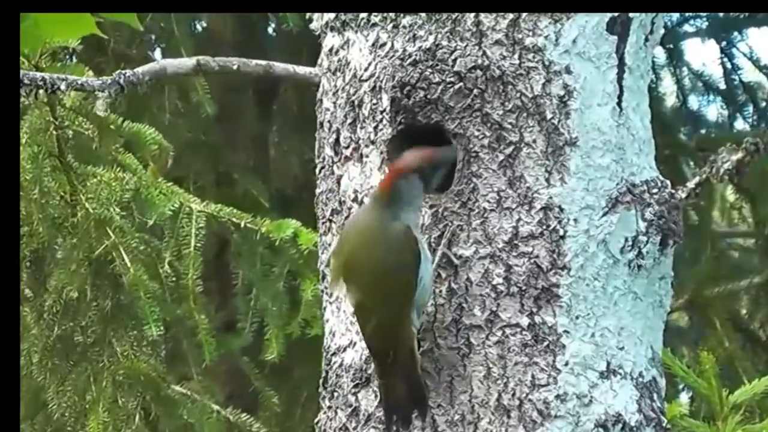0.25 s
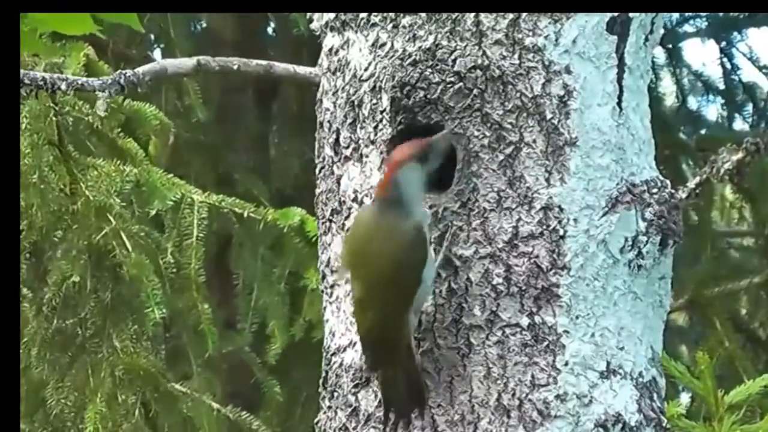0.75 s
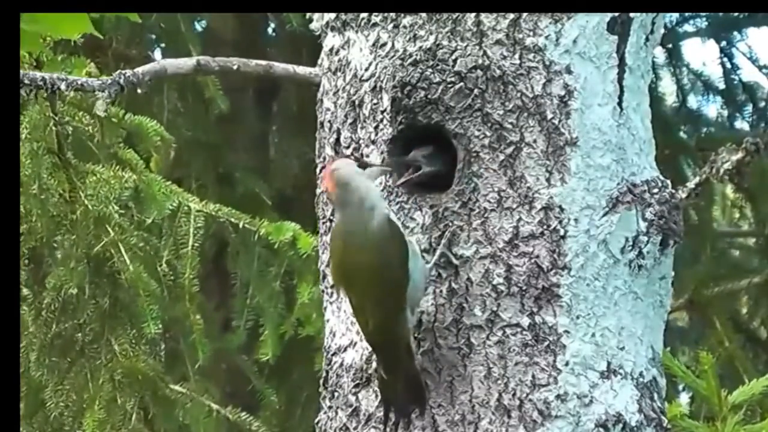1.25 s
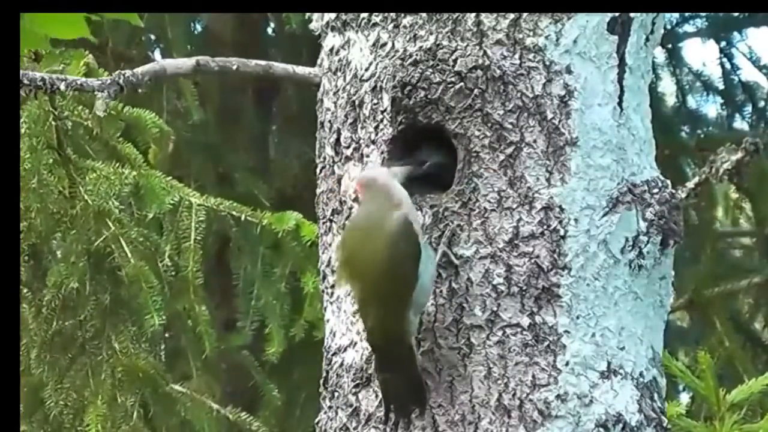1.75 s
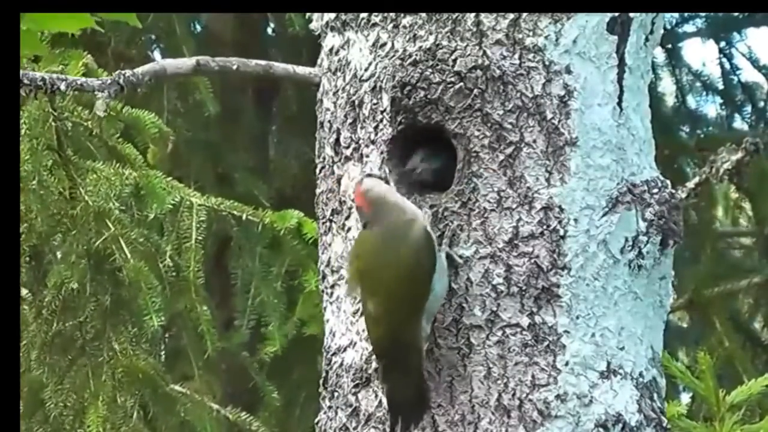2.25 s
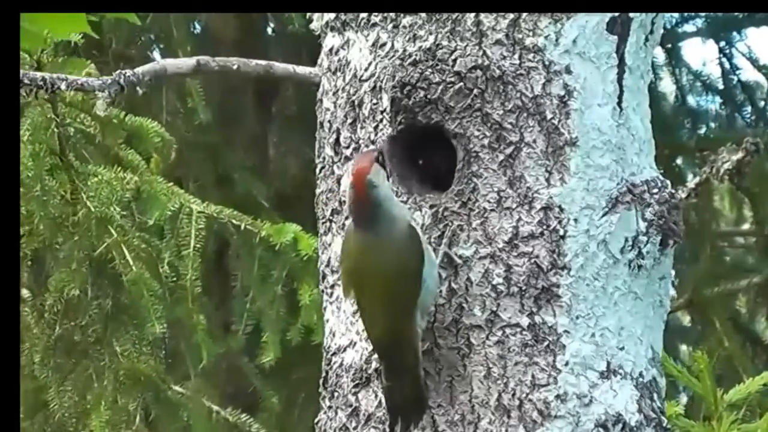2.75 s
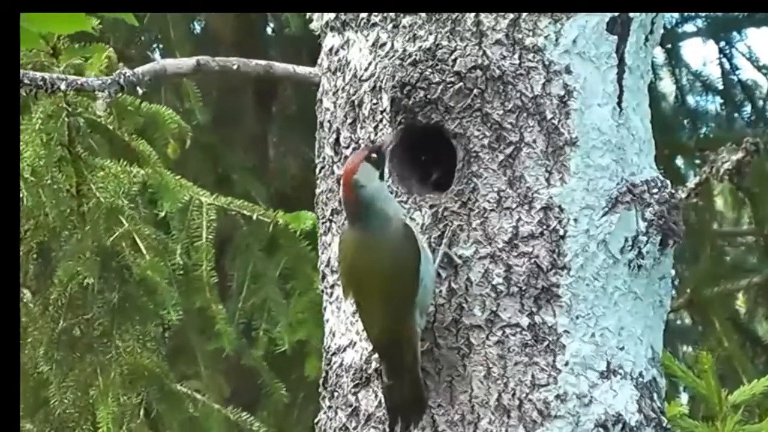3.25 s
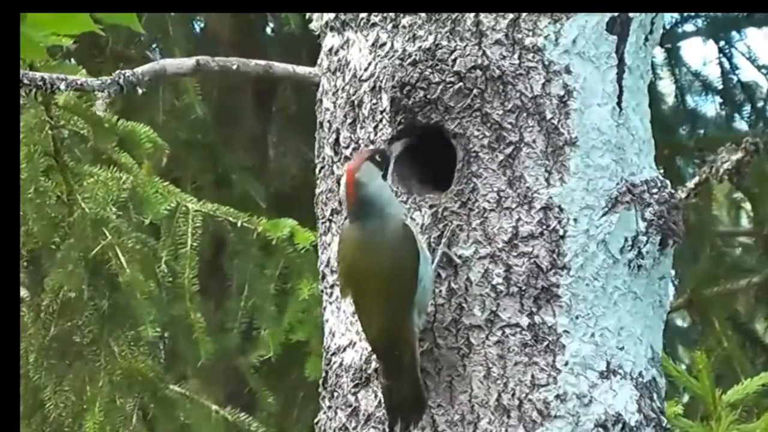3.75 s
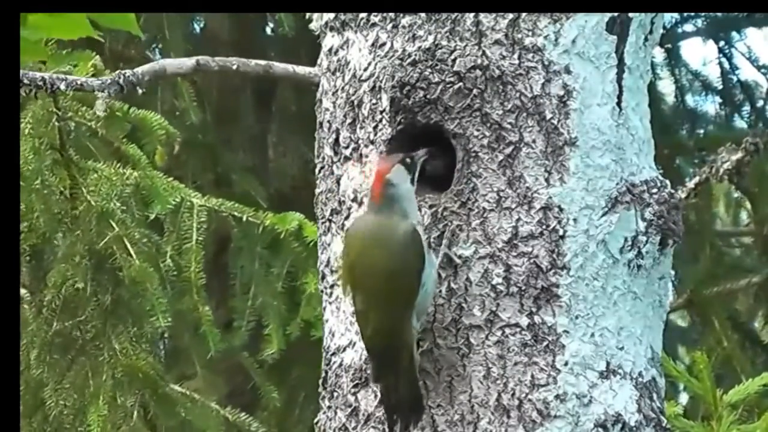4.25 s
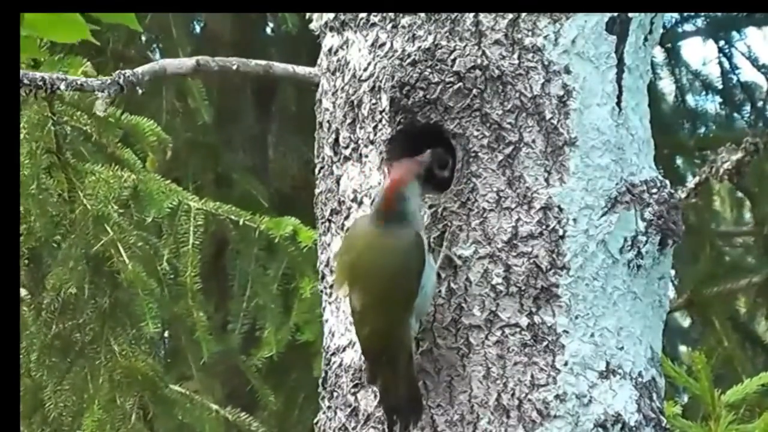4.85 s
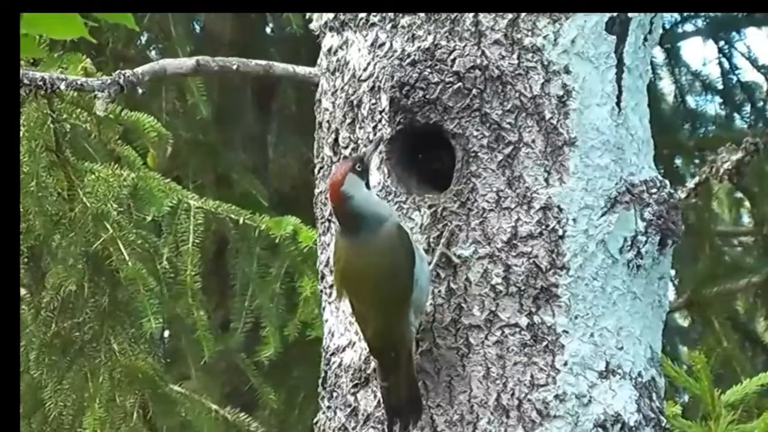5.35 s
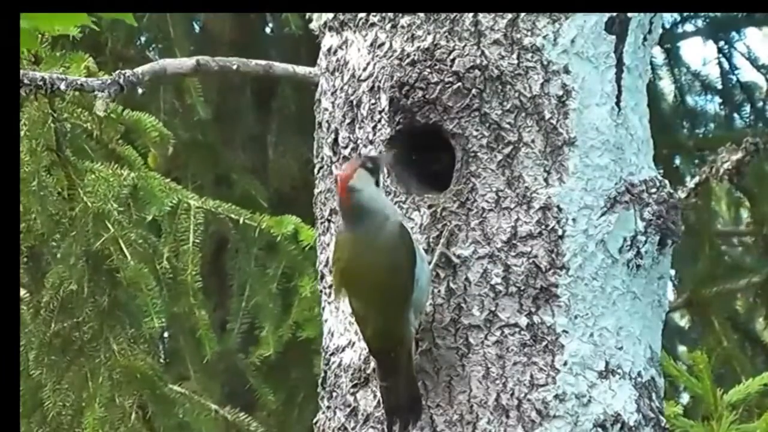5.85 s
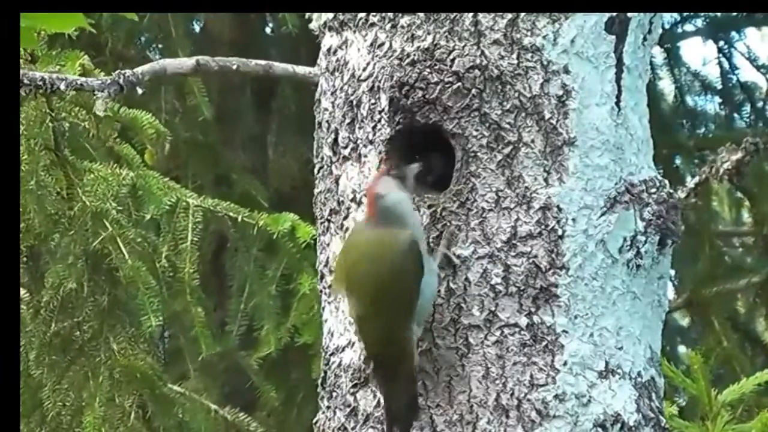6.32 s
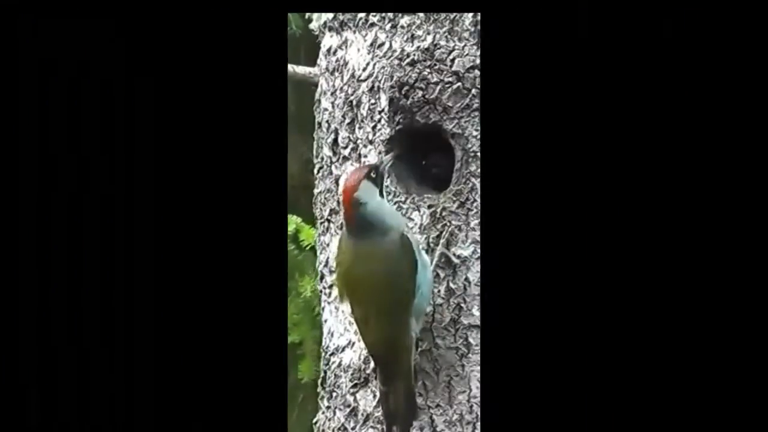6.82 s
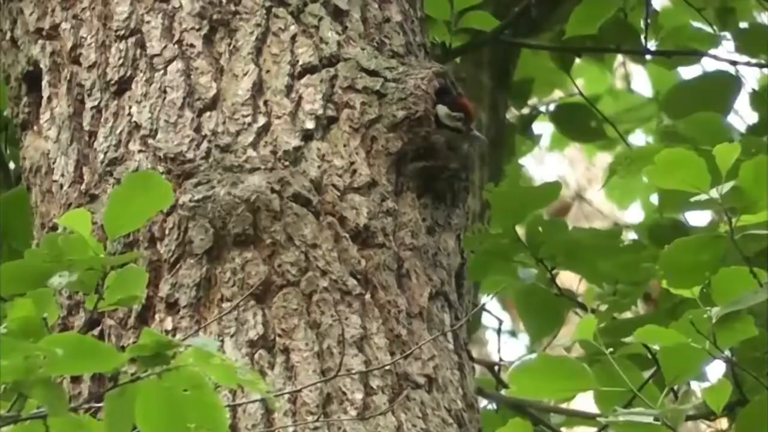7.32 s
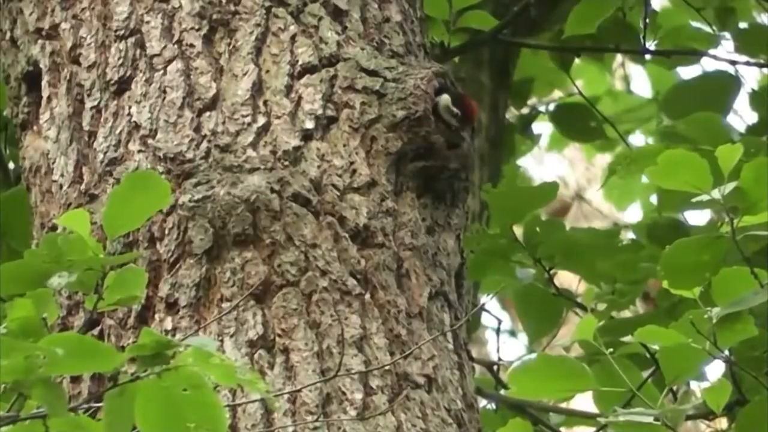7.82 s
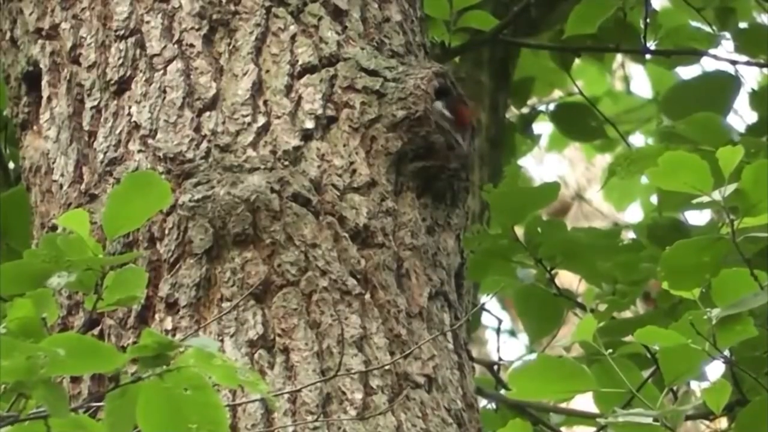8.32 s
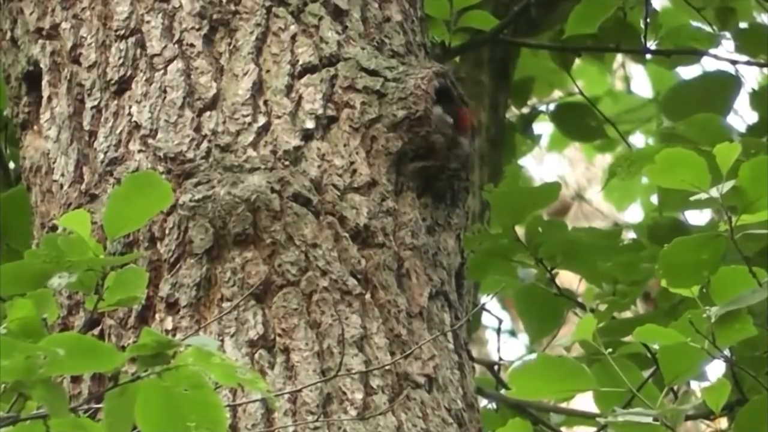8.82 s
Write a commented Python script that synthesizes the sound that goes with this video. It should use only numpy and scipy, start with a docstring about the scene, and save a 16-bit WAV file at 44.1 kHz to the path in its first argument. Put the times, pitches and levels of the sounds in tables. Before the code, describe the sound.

In quiet forest air with faint low gusts, a woodpecker nestling begs about four times a second, each call a creaky rasp ending in a short nasal honk. The calls weaken for a moment while a distant songbird lisps thinly, then return strongly. After a tiny silent gap, another place: an older chick gives sharp, high, arched cries about five a second, echoing among trunks over a faint low drone. Close stereo microphone at first, more reverberant afterwards.

```python
"""A forest with two woodpecker holes, heard through two microphone ports, a short silent cut between them.
At the first hole, in forest air and gusty low wind, a chick rasps with creaky pulses and breath, each rasp
ending on a honk of stacked partials; far off a small songbird lisps in thin arching whistles.
At the second, over a far drone, an older chick cries high arched notes, stacks of partials that sweep
up and fall; their echoes ring on among the trunks."""
import sys
import numpy as np
from scipy import signal
from scipy.fft import rfft, irfft
from scipy.io import wavfile
from scipy.ndimage import uniform_filter1d

SR = 44100
rng = np.random.default_rng(int(sys.argv[2]) if len(sys.argv) > 2 else 0)


def put_to_file(sound):
    """Save the sound as 16-bit audio at rate SR, in the file named by the first command-line argument."""
    columns = np.atleast_2d(sound).T  # one column per channel
    safe = np.clip(columns, -1, 1)
    whole_steps = np.round(safe * 32767)
    wavfile.write(sys.argv[1], SR, whole_steps.astype(np.int16))


N = 400428


def gain_of(db):
    """Decibels to gain."""
    return 10 ** (np.asarray(db) / 20)


def evened(x):
    """Scales to rms 1."""
    return x / np.sqrt(np.mean(x ** 2) + 1e-20)


def read(points, hz):
    """Reads a spectrum on a log-frequency axis."""
    f, value = np.transpose(points)
    return np.interp(np.log(hz + 1), np.log(f + 1), value)


def add(mix, s, sound):
    """Mixes a sound in at s seconds."""
    part = mix[max(round(s * SR), 0):][:len(sound)]
    part += sound[:len(part)]


def ring(x, modes, stretch):
    """Passes x through steep resonances whose centre frequencies are stretched by a factor."""
    hz = np.fft.rfftfreq(len(x), 1 / SR)
    response = 0
    for k, (f, width, db) in enumerate(modes):
        response = response + (-1) ** k * gain_of(db) / (1 + 1j * (hz - f * stretch) / width) ** 2
    return irfft(rfft(x) * response, len(x))


def waver(count, per_s):
    """Slow random wander of rms 1: noise averaged twice over 1 / per_s seconds."""
    size = max(int(SR / per_s), 2)
    return evened(uniform_filter1d(uniform_filter1d(rng.standard_normal(count), size), size))


# forest air at each hole, relative spectrum: f/Hz, level/dB per Hz
AIR_COLOUR_1 = [(18, -37), (30, -20), (66, 1), (276, -1.5), (369, 1.5), (672, -3), (896, -0.5), (1290, -9),
                (1680, -11), (2180, -15), (2680, -16.5), (4530, -8), (9410, -17), (13900, -34),
                (15500, -32)]
AIR_COLOUR_2 = [(25, -50), (60, -5), (110, -3), (220, -5), (350, -5.5), (600, -11), (1500, -13),
                (4000, -2.5), (9000, -23), (15500, -32)]
# left-right likeness of the air: f/Hz, likeness [-1 to 1]
AIR_LIKENESS_1 = [(60, -0.48), (130, -0.51), (290, -0.031), (640, 0.41), (1410, 0.35), (3100, 0.84),
                  (6820, 1), (15000, -0.064)]
AIR_LIKENESS_2 = [(60, 0.9), (130, 0.96), (290, 0.64), (640, 0.049), (1410, 0.79), (3100, 1.0), (6820, 1),
                  (15000, 0.94)]
# left-right lean of the air: f/Hz, left minus right level/dB
AIR_LEAN_1 = [(60, -6), (240, -3.5), (950, 1.5), (3770, -1), (15000, 0.5)]
AIR_LEAN_2 = [(60, -0.5), (240, 0.0), (950, 0.0), (3770, 0.0), (15000, 0.0)]
AIR_1_DB, AIR_2_DB = -51.5, -53.5


def air(colour, level_db, likeness, lean, patchy_db):
    """Forest air: random short-time spectra with drifting patches, partly alike at the two ports."""
    frames, hz = N // 256 + 5, np.fft.rfftfreq(1024, 1 / SR)
    a, b, c, d, patches = rng.standard_normal((frames, 513, 5)).T
    patches = uniform_filter1d(patches, size=12, axis=0)
    patches = evened(uniform_filter1d(patches, size=20, axis=1))
    like = np.clip(read(likeness, hz), -1, 1)[:, None]
    left = a + 1j * b
    right = like * left + np.sqrt(1 - like ** 2) * (c + 1j * d)
    half_lean_db = read(lean, hz)[:, None] / 2
    port_db = np.array([half_lean_db, -half_lean_db])
    spectra = np.array([left, right])
    spectra *= gain_of(read(colour, hz)[:, None] + patchy_db * patches + port_db)
    return gain_of(level_db) * evened(signal.istft(spectra, nperseg=1024, noverlap=768)[1][:, :N])


# low gusts at the first hole: t/s, peak level/dB at the left port
WIND_GUSTS = [(.01, -54), (.78, -62), (1.35, -59), (4.02, -56), (4.57, -57), (5.34, -52.5), (6.2, -67)]
GUST_SLOPE_DB_PER_S, CALM_DB = 52, -64.5  # slope on either side of a peak, floor between gusts


def rumble():
    """Lumpy low wind: noise rung near 56 Hz, pushing the two ports against each other."""
    t = np.arange(N) / SR
    gusts_db = np.max([db - GUST_SLOPE_DB_PER_S * abs(t - s) for s, db in WIND_GUSTS], axis=0)
    a, b = (evened(ring(rng.standard_normal(N), [(56, 6.0, 0)], 1)) for _ in "ab")
    return np.array([a, -.6 * a + .5 * b]) * gain_of(np.maximum(gusts_db, CALM_DB))


# begging calls of the first chick, levels at the source ahead of the throat: voice start t/s, voice length/s,
# start f/Hz, end f/Hz, voice level/dB, rasp lead/s, rasp level/dB, beak opening [factor on throat f]
CHICK_BEGS = [(0.072, 0.019, 757, 701, -30, 0.072, -30.5, 0.99),
              (.312, 0.026, 813, 712, -28.5, 0.097, -29, 0.98),
              (0.55, 0.029, 853, 765, -26.5, 0.08, -29.5, 1.02),
              (0.815, 0.019, 852, 787, -26, .08, -27.5, 1.06),
              (1.069, 0.028, 785, 729, -31.5, 0.089, -30, 1.024),
              (1.33, 0.027, 788, 727, -28, 0.089, -31, 0.96), (1.568, .012, 883, 850, -67, 0.055, -40, .63),
              (1.723, .015, 877, 855, -64.5, .05, -41.5, 0.59),
              (1.963, 0.033, 886, 843, -62.5, 0.057, -38.5, 0.63),
              (2.211, 0.0099, 880, 860, -62.5, 0.049, -45.5, 0.73),
              (2.34, .014, 880, 845, -63, .038, -47, 0.75),
              (2.443, 0.029, 880, 880, -67, 0.041, -50.5, 0.89),
              (2.645, 0.022, 878, 834, -58, 0.038, -41.5, 0.96),
              (2.865, 0.011, 891, 850, -57.5, 0.057, -32, .99),
              (3.107, 0.019, 944, 904, -32.5, 0.1, -28, 1.06),
              (3.359, 0.024, 1054, 926, -30, 0.092, -30.5, 1.08),
              (3.603, 0.03, 1054, 906, -34, 0.079, -30, 1.1),
              (3.87, .024, 1005, 920, -36, 0.057, -32, 1.08),
              (4.159, .03, 999, 840, -35.5, 0.062, -32.5, 1.01),
              (4.332, 0.087, 832, 962, -56, 0.0076, -38.5, 0.89),
              (4.41, .027, 986, 876, -31.5, .069, -31, .97),
              (4.628, .036, 1089, 906, -29, 0.081, -30.5, 1.01),
              (4.856, 0.039, 910, 845, -42.5, 0.063, -32, 0.95),
              (5.119, 0.031, 1029, 863, -30, 0.076, -28.5, 1.01),
              (5.365, .024, 891, 827, -25.5, 0.079, -29, 1.001),
              (5.628, 0.02, 866, 896, -25.5, 0.071, -32, 1),
              (5.882, 0.017, 888, 832, -23, 0.088, -29, 1.02),
              (6.142, 0.023, 892, 915, -25, .079, -28.5, 1.095),
              (6.371, .023, 860, 708, -34.5, 0.083, -30, 0.96),
              (6.629, .021, 879, 799, -24, 0.092, -27, 1.04),
              (6.888, 0.02, 850, 775, -25.5, 0.067, -29.5, 1.005)]
# chest, throat and treble resonances before stretching: f/Hz, width/Hz, level/dB
CHEST_MODES = [(900, 120, 0.5), (1800, 1900, -0.5)]
THROAT_MODES = [(4254, 662, -2), (5030, 1290, -13), (7110, 520, -15)]
TREBLE_MODES = [(8390, 2160, -7), (10360, 2180, -5), (11580, 2480, -10)]
# nasal dips before stretching: f/Hz, width/Hz, depth [0 to 1]
NASAL_DIPS = [(3160, 570, 0.11), (7580, 1080, 0.68)]
# bands where voice partials stay weak: f/Hz, width/Hz, level/dB
WEAK_BANDS = [(2800, 690, -10.5), (6300, 700, -4)]
RASP_START_DB = -33.5  # a rasp sets in at this level, or at its own if that is weaker
FIRM_VOICE_DB = -28.5  # a voice above this is firm
HUMP_DB, HUMP_PER_DB = -4.5, 0.2154  # the weaker the voice, the earlier the rasp is full
CHEST_UNDER_RASP_DB, CHEST_MOST_DB = -11.5, 7.5  # the chest honk follows the breath, capped over the voice
GAPE, GAPE_SHUT = 0.95, 0.61  # factor on the treble modes, and its fall as the beak shuts
HONK_SCOOP, HONK_SCOOP_S = 0.036, 0.0043  # the honk slides up into its pitch: share, time constant
BRIGHT_PEAK_AT, BRIGHT_FALL_DB = 0.44, -8  # throat voice peaks at this share of the honk, fades either side
TREBLE_DB, TREBLE_PER_FIRM_DB, TREBLE_SHUT_DB = -6.5, -1, -30  # firm voices and shut beaks are duller


def honk(t, u, hz0, hz1, voice_db):
    """Voiced honk: 18 wavering partials on a gliding pitch, some of them held weak."""
    hz = (hz0 + (hz1 - hz0) * u ** 1.8) * (1 + .011 * waver(len(t), 300))
    scoop = 1 - HONK_SCOOP * np.exp(-np.maximum(t, 0) / HONK_SCOOP_S)
    turns = np.cumsum(hz * scoop) / SR
    uneven_db = 0.95 * rng.standard_normal(18)  # each honk favours other partials
    partial_hz = np.arange(1, 19) * (hz0 + hz1) / 2
    for gap_hz, gap_width, gap_db in WEAK_BANDS:
        uneven_db += gap_db * np.exp(-((partial_hz - gap_hz) / gap_width) ** 2)
    stack = 0
    for k in range(1, 19):
        shiver_db = .4 * k * waver(len(t), 250)
        stack = stack + gain_of(uneven_db[k - 1] + shiver_db) * np.cos(2 * np.pi * k * turns)
    return stack * np.sin(np.pi * u ** 0.74) ** 0.37 * gain_of(voice_db)


def creaky_rasp(t, length, lead, rasp_db, hump_db):
    """Rasp: uneven random pulses, about 700 a second, mixed with breath noise under one swell."""
    struck = rng.random(len(t)) < 700 / SR
    pulses = struck * rng.uniform(-1.46, 1, len(t))
    creak = evened(pulses + 1e-9) + 1.1 * rng.standard_normal(len(t))
    start_db = min(RASP_START_DB, rasp_db)
    swell_db = np.interp(t, [-lead, -.4 * lead, 0, length * 1.21, length + 0.033],
                         [start_db, (start_db + rasp_db) / 2 + hump_db, rasp_db, rasp_db - 11.0, rasp_db - 24])
    soft = np.clip((t + lead) / (.45 * lead), 0, 1) * np.clip((t[-1] - t) / .02, 0, 1)
    flutter_db = 1.3 * waver(len(t), 70) + .7 * waver(len(t), 300)
    return creak * soft * gain_of(swell_db + flutter_db)


def beg(s, length, hz0, hz1, voice_db, lead, rasp_db, beak):
    """Begging call: a rasp and its closing honk ring through chest, throat and open or shut beak."""
    shut = max(1 - beak, 0)
    hump_db = HUMP_DB + HUMP_PER_DB * (FIRM_VOICE_DB - voice_db)
    chest_db = min(rasp_db + CHEST_UNDER_RASP_DB - voice_db, CHEST_MOST_DB)
    treble_db = TREBLE_DB + TREBLE_PER_FIRM_DB * max(voice_db - FIRM_VOICE_DB, 0) + TREBLE_SHUT_DB * shut
    gape = GAPE - GAPE_SHUT * shut
    t = np.arange(-lead, length + 0.068, 1 / SR)
    u = np.clip(t / length, 0, 1)
    voice = honk(t, u, hz0, hz1, voice_db)
    rasp = creaky_rasp(t, length, lead, rasp_db, hump_db)
    chest = ring(gain_of(chest_db) * voice, CHEST_MODES, 0.774)
    voice = voice * gain_of(BRIGHT_FALL_DB * (u - BRIGHT_PEAK_AT) ** 2)
    # a half-shut beak closes further, so its ring sinks
    closing = np.clip((t + lead) / (lead + length), 0, 1)
    sink = 0.28 * shut
    sound = ring((voice + rasp) * np.sqrt(1 - closing), THROAT_MODES, beak + sink)
    sound += ring((voice + rasp) * np.sqrt(closing), THROAT_MODES, beak - sink / 3)
    sound += chest
    sound += ring(rasp, [(1590, 624, -7)], gape)  # the hoarse low body of the rasp
    sound += ring(gain_of(treble_db) * (voice + gain_of(6.0) * rasp), TREBLE_MODES, gape)
    for hz, width, depth in NASAL_DIPS:
        sound -= np.clip(depth, 0, 1) * ring(sound, [(hz * beak, width, 0)], 0.936)
    return s - lead, sound


# echo decay among the trunks at each hole: f/Hz, t60/s
ECHO_DECAY_1 = [(500, 0.18), (2000, 0.27), (5000, 0.2), (12000, 0.19)]
ECHO_DECAY_2 = [(500, 1.05), (2000, 0.45), (3500, 0.86), (5000, 0.76), (7500, 0.52), (12000, 0.5)]


def woods(x, decay, first_s, apart):
    """Scattered echoes off trunks: sparse taps, each band dying at its own speed, three tails taking turns."""
    out, t = np.zeros((2, N)), np.arange(N) / SR
    for k in range(3):
        taps = np.zeros((2, SR))
        at = np.arange(0, SR - 20, 20) + rng.integers(0, 20, (2, (SR - 1) // 20))
        np.put_along_axis(taps, at, rng.choice([-1., 1.], at.shape), 1)
        taps *= np.arange(SR) > first_s * SR  # silence before the first echo
        hz, s, z = signal.stft(taps, SR, nperseg=256)
        dying = gain_of(-60 * s / read(decay, hz)[:, None])
        mid, side = signal.istft(z * dying, SR, nperseg=256)[1]
        tail = np.array([mid + apart * side, mid - apart * side]) / np.linalg.norm(mid)
        turn = np.sqrt(2 / 3) * np.cos(2 * np.pi * (.7 * t + k / 3))
        out += signal.fftconvolve((x * turn)[None], tail, axes=1)[:, :N]
    return out


# far songbird, before echo and port lean: t/s, length/s, start f/Hz, top f/Hz, end f/Hz, level/dB
BIRD_LISPS = [(1.975, .085, 8830, 8760, 8750, -58), (2.195, .12, 7760, 8490, 8480, -54),
              (2.45, .17, 7650, 8330, 8150, -56), (2.82, .21, 7350, 8330, 7950, -54)]
LISP_TOP_AT = .62  # share of the length


def lisp(s, length, start_hz, top_hz, end_hz, level_db):
    """Songbird lisp: a thin high whistle that arches over, with a fast shiver in it."""
    t = np.arange(0, length, 1 / SR)
    u = t / length / LISP_TOP_AT - 1  # 0 at the top of the arch
    rise = (top_hz - start_hz) * u ** 2
    fall = (top_hz - end_hz) * (u / (1 / LISP_TOP_AT - 1)) ** 2
    pitch = (top_hz - np.where(u < 0, rise, fall)) * (1 + 0.0052 * waver(len(t), 270))
    tone = np.sqrt(2) * np.sin(2 * np.pi * np.cumsum(pitch) / SR)
    return s, tone * gain_of(level_db + 2.5 * waver(len(t), 40)) * signal.windows.tukey(len(t), .25)


# far drone at the second hole: t/s, f/Hz, level/dB
FAR_DRONE = [(7.08, 215, -60.5), (7.79, 240.3, -60), (8.19, 206, -63.5), (8.62, 214.3, -68.5),
             (9.08, 207.8, -72)]


def drone():
    """A fuzzy low hum that drifts in pitch: slow noise carried on a moving tone."""
    t, (s, hz, db) = np.arange(N) / SR, np.transpose(FAR_DRONE)
    turns = np.cumsum(np.interp(t, s, hz)) / SR
    hum = waver(N, 90) * np.cos(2 * np.pi * turns) + waver(N, 117) * np.sin(2 * np.pi * turns)
    return hum * gain_of(np.interp(t, s, db))


# cries of the second chick, the first heard as echo only: t/s, length/s, top at [share of length], top f/Hz,
# end pitch [share of top], bend of the rise, bend of the fall, second partial level/dB, third partial level/dB,
# late change/dB [per 0.34 of the length past the top], puff lead/s
OLDER_CRIES = [(6.98, .055, .45, 2000, .6, 1.5, 2.2, -46, -58, 9.5, .025),
               (7.1644, .05, .35, 2412, .44, 2.95, 1.9, -32.5, -41, -5.5, .012),
               (7.4899, .048, .39, 2484, .41, 1.14, 2.7, -33, -40.5, 1.01, .011),
               (7.7543, .056, .36, 2349, .51, 1.9, 2.85, -32, -29.5, -2.1, .025),
               (7.9226, .058, .33, 2280, .51, 1.13, 2.69, -33.5, -28.5, -3.5, .027),
               (8.097, .068, .38, 2263, .59, 1.9, 1.7, -34.5, -27.5, -6.5, .026),
               (8.2769, .075, .42, 2548, .41, .7, 2.01, -32.5, -26.5, -5, .035),
               (8.4692, .062, .4, 2397, .59, .8, 2.38, -35.5, -26.5, -2.1, .024),
               (8.6687, .058, .39, 2278, .64, 1.08, 2.52, -38.5, -28, -2.1, .013),
               (8.8528, .06, .32, 2398, .53, .8, 2.91, -36.5, -26, -3.5, .011),
               (9.0546, .06, .55, 2505, .75, 3.3, 2.23, -36.5, -25.5, -3, .023)]
# partials 4 to 7 against the third: level/dB
UPPER_PARTIALS_DB = (-3, -12, -21, -28)
SHOULDER = .85  # pitch at the foot of the rise as a share of the top, before the opening hook
FIRST_PARTIAL_DB, FIRST_OVER_THIRD_DB = -38.5, 4  # the lowest is set no louder than this over the third
FALL_SWELL_DB = 21  # the second partial swells as the pitch drops, dB for a drop to zero
CREST_DULL_DB = 5.5  # for each partial above the third
PUFF_DB = -44


def cry(s, length, top_at, top_hz, end, rise_bend, fall_bend, second_db, third_db, late_db, lead):
    """A small puff as the beak opens, then a stack of partials that hooks up, arches and falls away."""
    partial_db = [min(FIRST_PARTIAL_DB, third_db + FIRST_OVER_THIRD_DB), second_db, third_db]
    partial_db += [third_db + db for db in UPPER_PARTIALS_DB]
    t = np.arange(-lead, length + 0.022, 1 / SR)
    u = np.clip(t / length, 0, 1)
    rise = (1 - SHOULDER) * np.clip(1 - u / top_at, 0, 1) ** rise_bend
    fall = (1 - end) * np.clip((u - top_at) / (1 - top_at), 0, 1) ** fall_bend
    hook = .25 * np.exp(-np.maximum(t, 0) / .0025)
    hz = top_hz * (1 - rise - fall) * (1 - hook) * (1 + 0.005 * waver(len(t), 470))
    turns = np.cumsum(hz) / SR
    crest = np.exp(-((u - top_at - .06) / .2) ** 2)
    # near the top of the arch the tone is purest: upper partials fade, the lower ones grow a little
    stack = 0
    for k, db in enumerate(partial_db, 1):
        dulling_db = CREST_DULL_DB * crest * np.clip(k - 3, -.3, 3.5)
        shiver_db = (1.6 + .2 * k) * waver(len(t), 200)
        swell_db = FALL_SWELL_DB * fall * (k == 2)
        partial = gain_of(db + swell_db - dulling_db + shiver_db) * np.cos(2 * np.pi * k * turns)
        stack = stack + partial * (k * hz < SR / 2.2)
    gate = np.clip(t / 0.0065, 0, 1) * np.clip((length - t) / 0.016, 0, 1)
    gate *= gain_of(late_db * np.clip(u - top_at, 0, 1) / 0.34)
    noise = rng.standard_normal((2, len(t)))
    breath = ring(noise[0], [(1060, 220, -24.5), (3560, 1710, 1.0), (8400, 3350, 2.5)], 0.86)
    breath *= gain_of(max(partial_db))
    # the voice breaks up at both ends
    edges = np.exp(-((t - .003) / 0.006) ** 2) + np.exp(-((t - 0.93 * length) / 0.011) ** 2)
    puff = ring(noise[1], [(1240, 2400, 3), (3100, 1800, 3.0)], 0.9)
    puff *= np.exp(-(t + lead) / 0.015) * np.clip((t + lead) / 0.00032, 0, 1)
    airy = breath * (gain_of(-8.5) * edges + gain_of(-35) * gate) + gain_of(PUFF_DB) * puff
    return s - lead, stack * gate + airy


def first_hole():
    """The rasping chick and its echoes, the far songbird, forest air and wind."""
    chick, bird = np.zeros(N), np.zeros(N)
    for row in CHICK_BEGS:
        add(chick, *beg(*row))
    for row in BIRD_LISPS:
        add(bird, *lisp(*row))
    mix = chick + gain_of(-11.0) * woods(chick, ECHO_DECAY_1, .006, 0.31)
    mix += ring(chick, [(9900, 740, -9.0)], 0.95) * [[1], [-1]]  # the ports part ways in the treble
    mix += bird * gain_of([[-1.5], [1.5]])  # leans right
    mix += gain_of(1) * woods(bird, ECHO_DECAY_1, 0.017, 0.5)
    return mix + air(AIR_COLOUR_1, AIR_1_DB, AIR_LIKENESS_1, AIR_LEAN_1, 1.3) + rumble()


# a cry turned away is duller and echoes more: dB of echo for each dB the third partial lacks
ECHO_DB, ECHO_PER_DB = -5, 0.192
FACING_DB = -25.5  # third partial of a cry aimed at the microphone


def second_hole():
    """The older chick, its cries ringing on among the trunks, forest air and the far drone."""
    older, sent = np.zeros(N), np.zeros(N)  # sent: what the turning chick throws into the trees
    for row in OLDER_CRIES:
        s, sound = cry(*row)
        third_db = row[8]
        add(older, s, sound)
        add(sent, s, gain_of(ECHO_DB + ECHO_PER_DB * (FACING_DB - third_db)) * sound)
    leafy = ring(sent, [(4570, 5100, 1.34)], 0.93)  # leaves swallow the treble
    mix = older + woods(leafy, ECHO_DECAY_2, 0.0013, 0.0016)
    return mix + air(AIR_COLOUR_2, AIR_2_DB, AIR_LIKENESS_2, AIR_LEAN_2, 0.61) + drone()


CUT_OUT_S, CUT_IN_S = 7.048, 7.081  # first hole silent from here, second hole at full level from here


def scene():
    """The first hole, a silent cut, the second hole."""
    t = np.arange(N) / SR
    fade_out = np.clip((CUT_OUT_S - t) / 0.012, 0, 1)
    fade_in = np.clip((t - CUT_IN_S) / 0.0017 + 1, 0, 1)
    return first_hole() * fade_out + second_hole() * fade_in


EDGE_HZ = 15450


def record(dry):
    """The band limit of the recorder: a steep low-pass."""
    low_pass = signal.firwin(511, EDGE_HZ, window=("kaiser", 9), fs=SR)
    return signal.oaconvolve(dry, low_pass[None], "same")


dry = scene()
out = record(dry)
put_to_file(out)
```